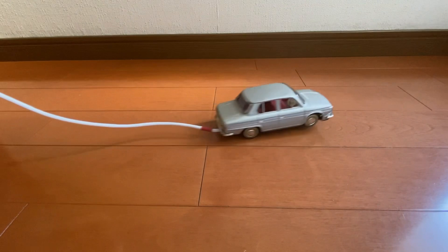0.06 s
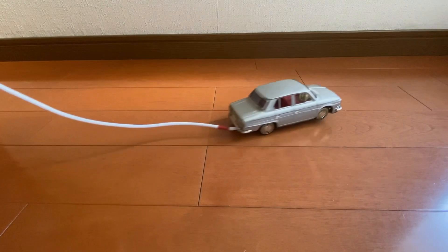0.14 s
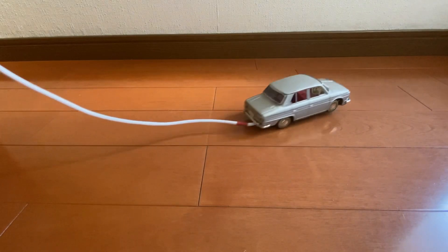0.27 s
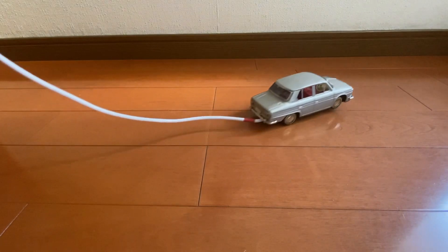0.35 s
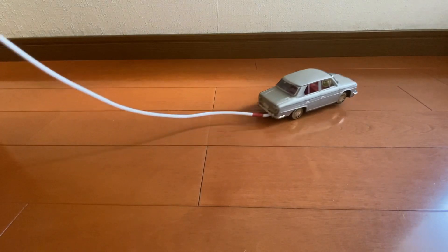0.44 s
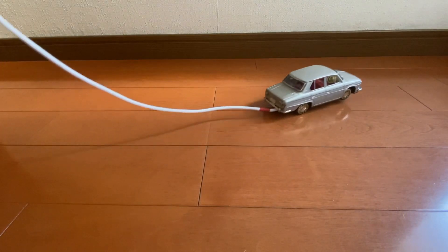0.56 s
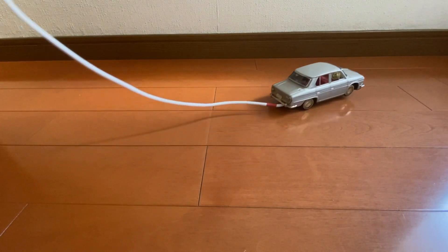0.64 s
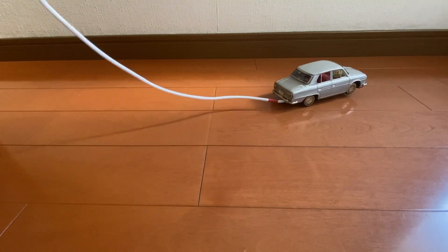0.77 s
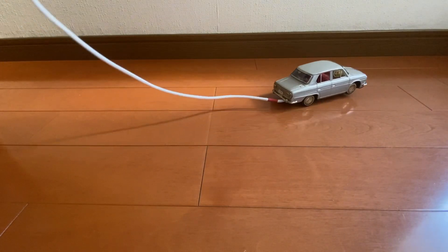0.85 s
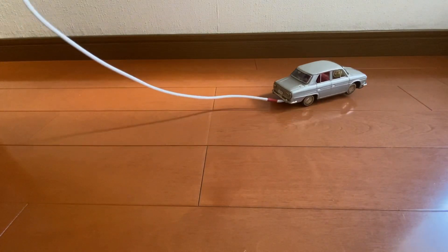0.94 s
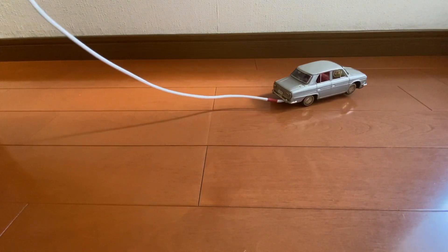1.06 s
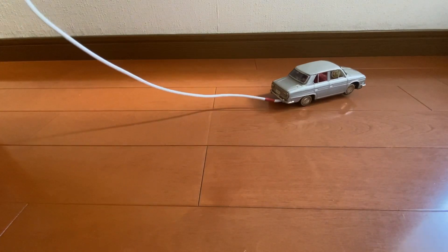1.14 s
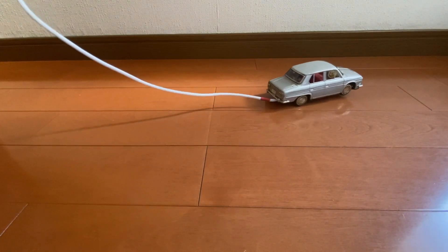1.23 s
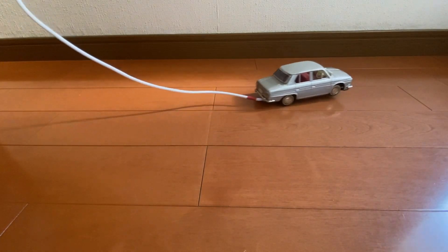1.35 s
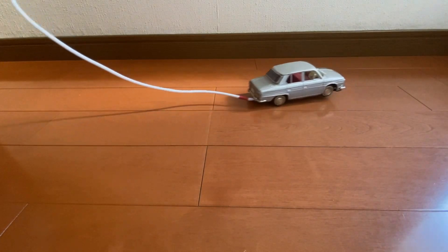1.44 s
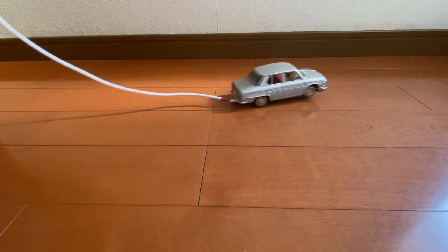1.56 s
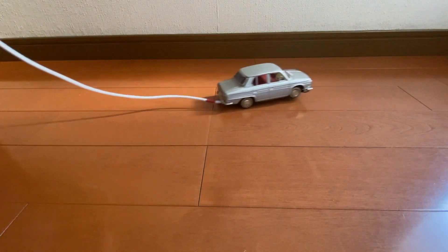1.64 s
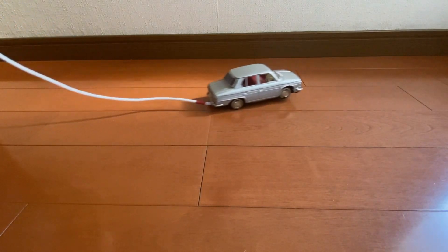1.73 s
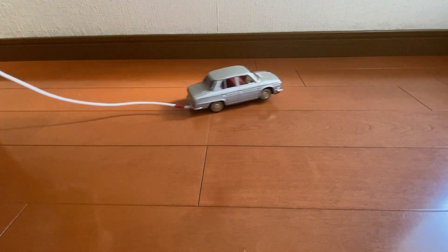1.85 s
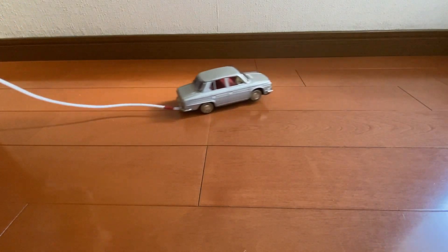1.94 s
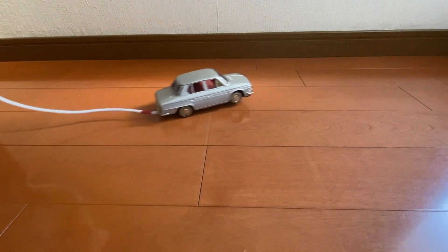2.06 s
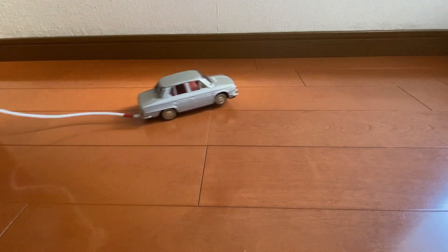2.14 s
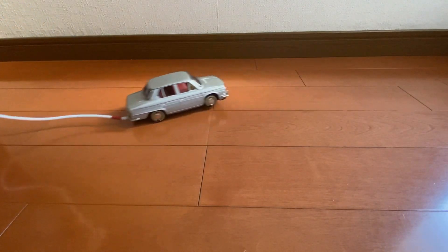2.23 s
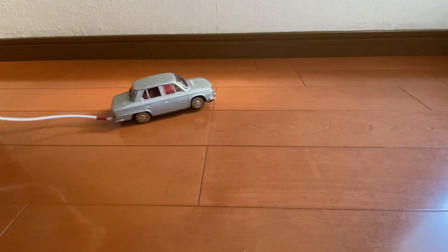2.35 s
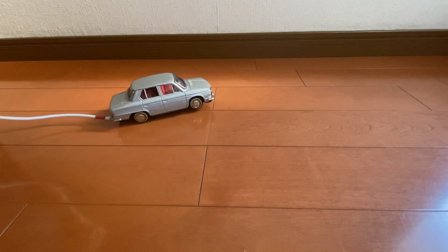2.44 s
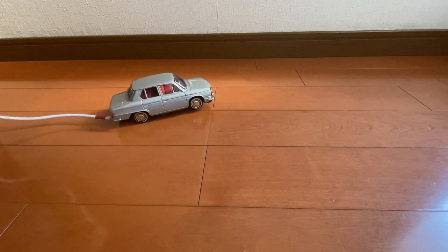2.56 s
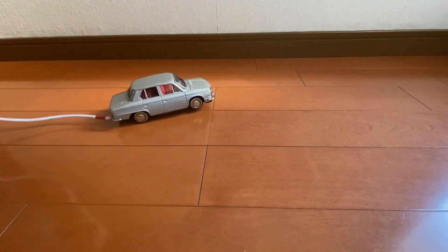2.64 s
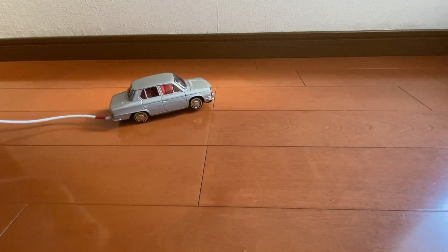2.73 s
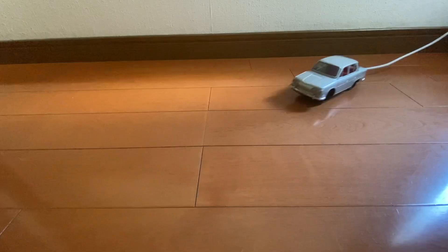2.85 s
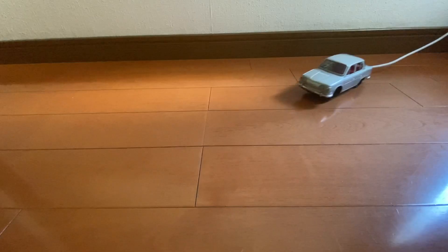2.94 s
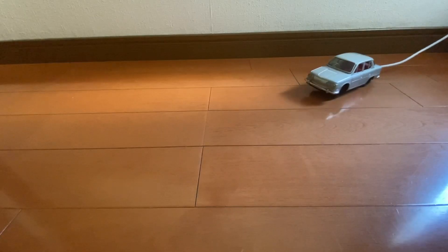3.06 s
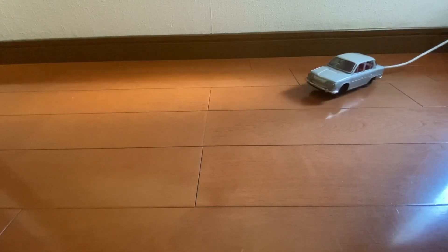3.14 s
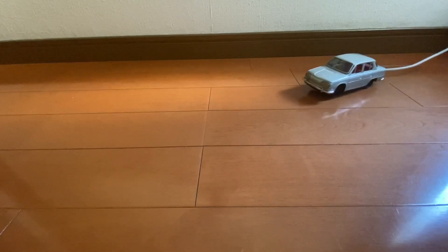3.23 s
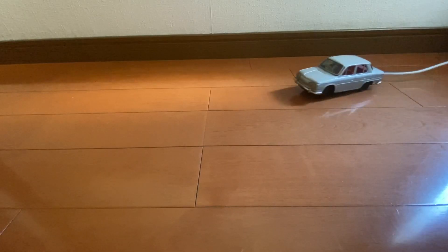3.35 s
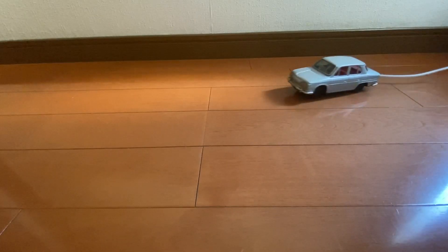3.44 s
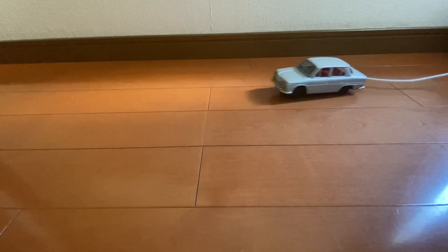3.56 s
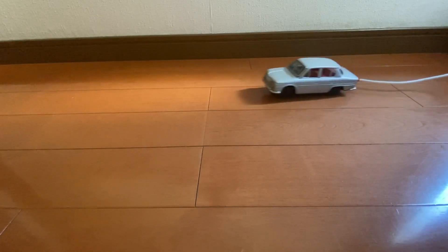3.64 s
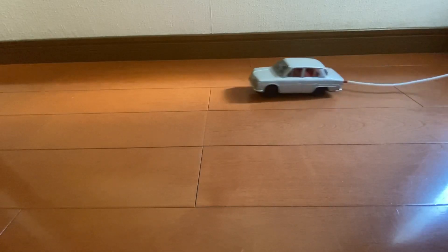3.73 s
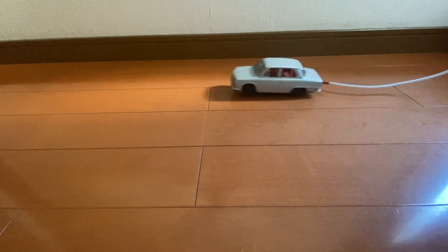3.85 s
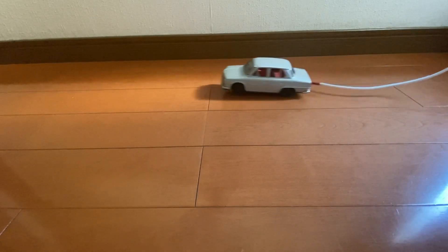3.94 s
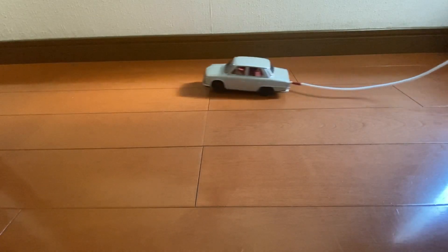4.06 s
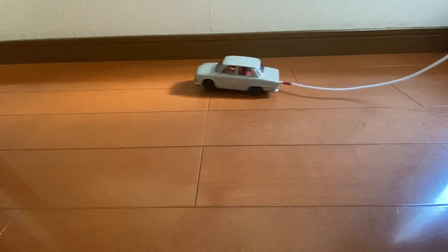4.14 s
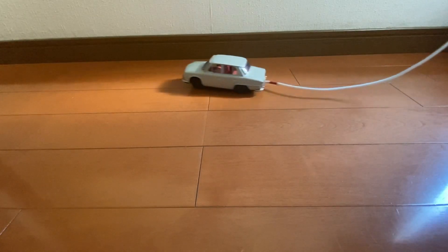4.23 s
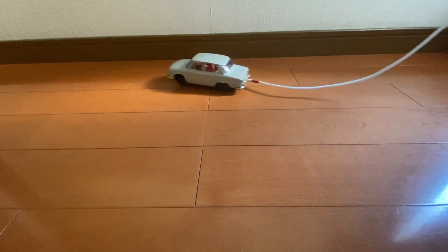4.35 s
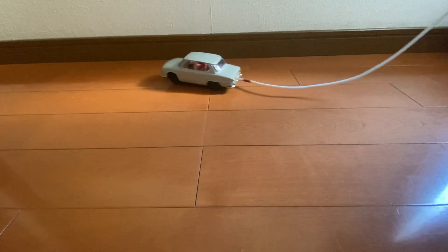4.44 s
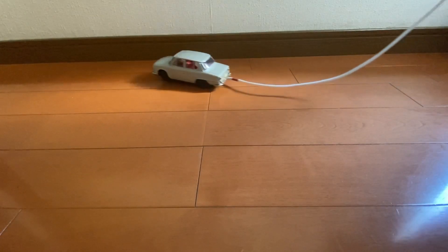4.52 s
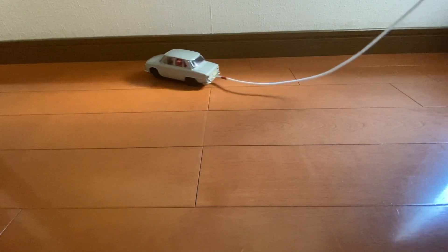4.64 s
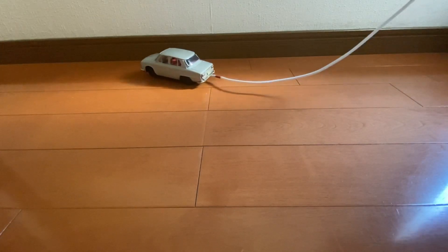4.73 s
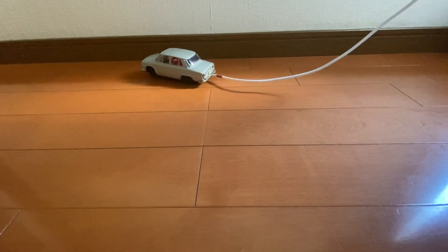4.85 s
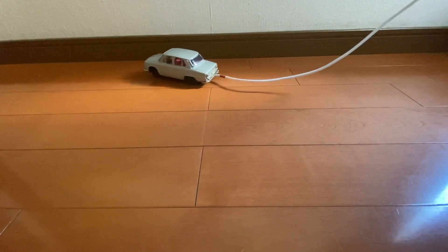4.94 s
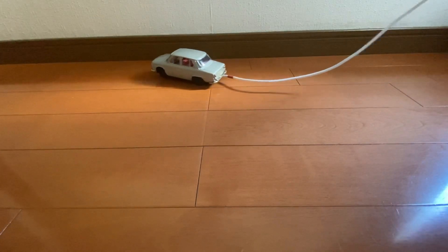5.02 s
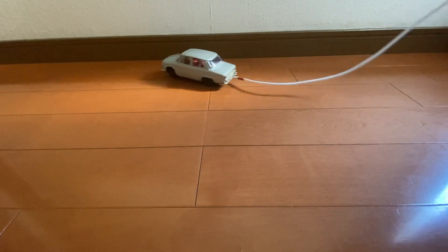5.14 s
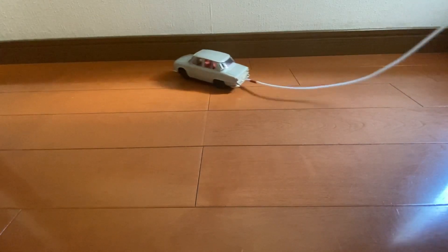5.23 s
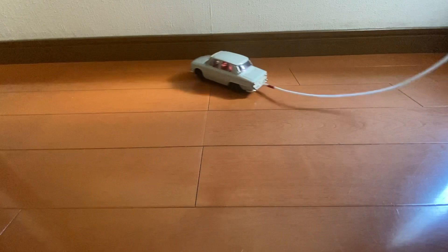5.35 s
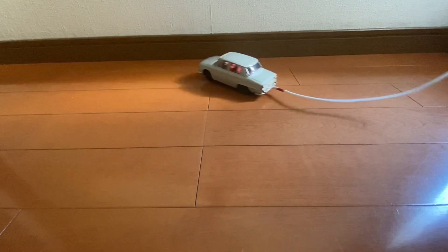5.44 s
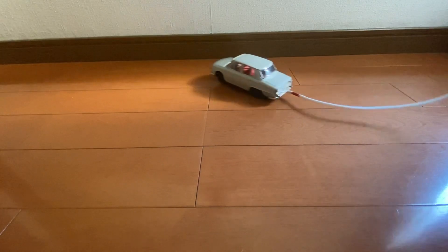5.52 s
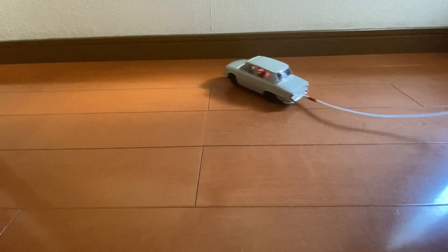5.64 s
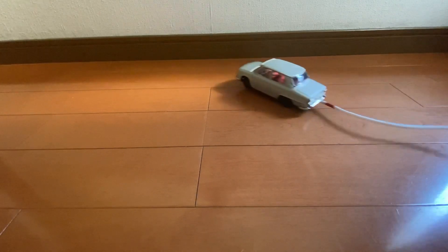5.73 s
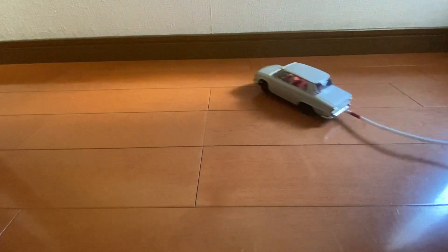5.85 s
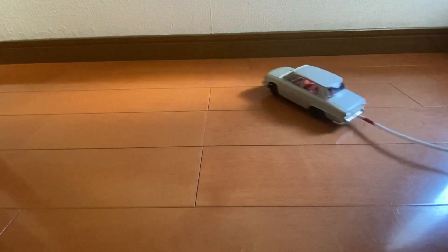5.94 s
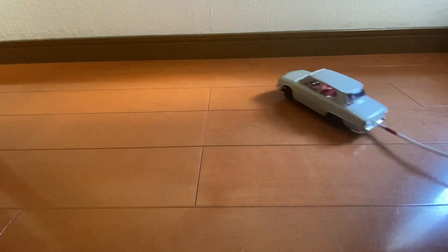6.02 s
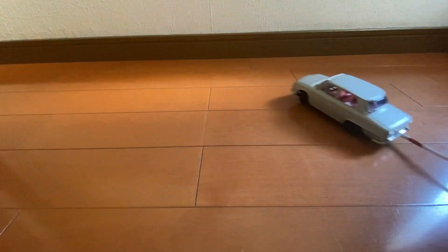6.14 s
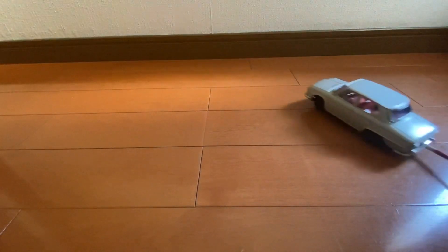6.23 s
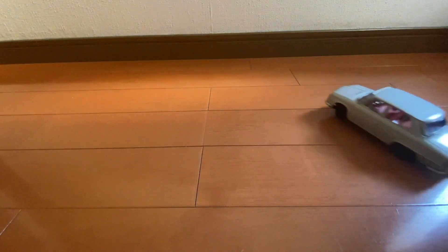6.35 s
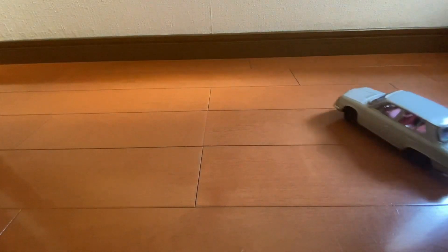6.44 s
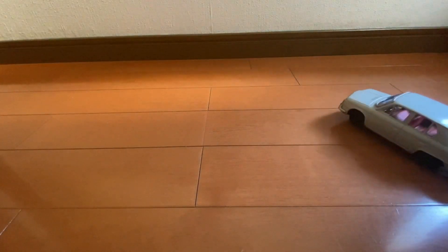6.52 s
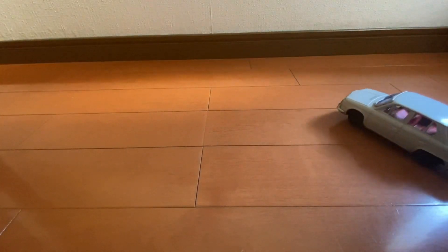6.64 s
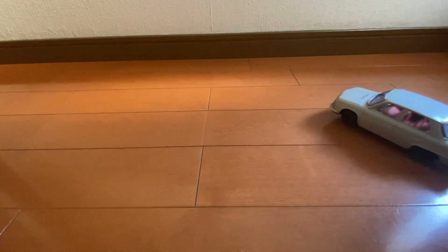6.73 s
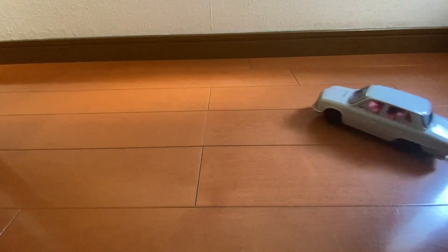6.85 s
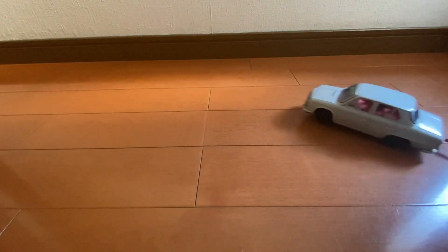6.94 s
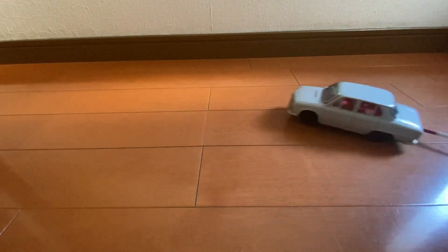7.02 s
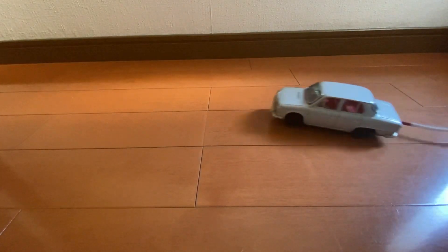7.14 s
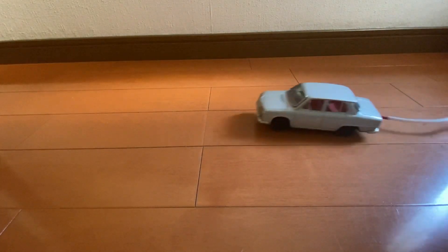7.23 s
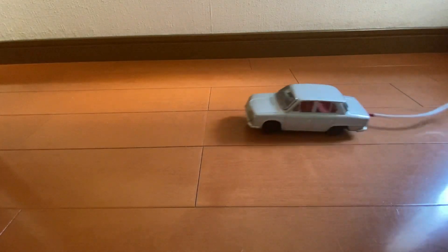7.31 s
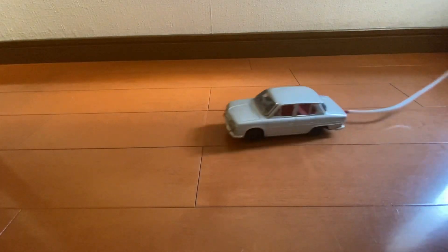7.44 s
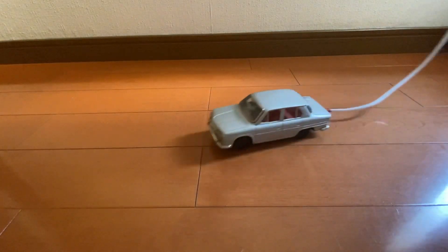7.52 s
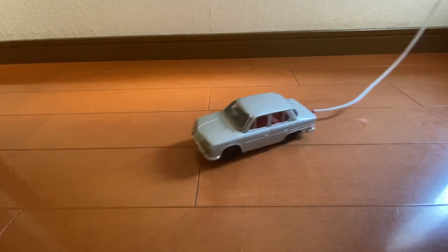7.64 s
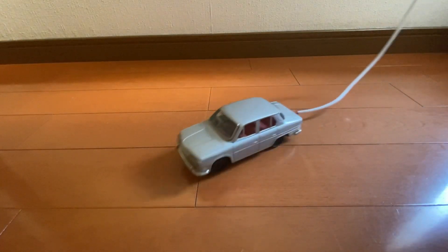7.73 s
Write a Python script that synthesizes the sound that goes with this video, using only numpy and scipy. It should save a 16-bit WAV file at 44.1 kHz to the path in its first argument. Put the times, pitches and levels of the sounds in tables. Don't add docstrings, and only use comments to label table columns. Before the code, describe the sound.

Bright, rattling gear whir from a small tin car runs in bursts of one to two seconds, forward and then in reverse with a slightly different buzz. Tiny squeaks follow the first stop. After an abrupt scene change near three seconds, longer runs continue with harder knocks and uneven wheel thumps on floorboards, in a small reverberant room, picked up nearby in stereo.

```python
import sys
import numpy as np
from scipy import signal
from scipy.fft import rfft, irfft
from scipy.io import wavfile
from scipy.ndimage import uniform_filter1d, map_coordinates

SR = 44100
rng = np.random.default_rng(int(sys.argv[2]) if len(sys.argv) > 2 else 0)


def file_out(sig):
    cols = np.atleast_2d(sig).T
    lim = np.clip(cols, -1, 1)
    pcm = np.round(lim * 32767).astype(np.int16)
    wavfile.write(sys.argv[1], SR, pcm)


def volts_from_decibels(level):
    exponent = np.asarray(level, float) / 20
    return 10 ** exponent


N = 343098
CUT_S = 2.861


def evened(x):
    return x / np.sqrt(np.mean(x ** 2) + 1e-20)


def steadied(x, span_s):
    power = uniform_filter1d(x ** 2, round(span_s * SR))
    return evened(x / np.sqrt(power + 0.16 * np.mean(x ** 2)))


def read(points, hz):
    f, value = np.transpose(points)
    return np.interp(np.log(hz + 1), np.log(f + 1), value)


def drift(top_hz):
    step = 64
    size = N // step + 2
    spectrum = rfft(rng.standard_normal(size))
    spectrum = spectrum / (1 + (np.fft.rfftfreq(size, step / SR) / top_hz) ** 2)
    slow = np.interp(np.arange(N) / step, np.arange(size), irfft(spectrum, size))
    return 2 * np.tanh(evened(slow) / 1.7)


def ring(x, modes, wander_db, order=1):
    out = np.zeros(N)
    for hz, width, db in modes:
        mode = x
        for _ in range(order):
            mode = signal.lfilter(*signal.iirpeak(hz, hz / (width * order ** .6), SR), mode)
        out += volts_from_decibels(db + wander_db * drift(2.)) * mode
    return out


def colour(x, points):
    log_gain = np.log(volts_from_decibels(read(points, abs(np.fft.fftfreq(4096, 1 / SR)))))
    taps = np.fft.ifft(np.exp(log_gain - 1j * signal.hilbert(log_gain).imag)).real
    return signal.oaconvolve(x, taps[:2048])[:N]


def teeth(per_s, spread_db):
    hardness_db = spread_db * np.minimum(rng.exponential(1, N), 5)
    size = volts_from_decibels(hardness_db) * rng.choice([-1., 1.], N)
    return evened(size * (rng.random(N) < per_s / SR))


# time in seconds, load on the gears in dB,
# twist of the chassis in dB, treble tilt in dB as the car's side faces the phone.
STRAIN = [(0, 0.4, 3.5, 10.5), (.5, .5, 0.5, 7.5), (1.2, .5, -0.5, 4), (1.4, -1, 1, 6),
          (1.6, .5, -1.5, 1.5), (2.2, -1, -6, 5), (3.2, 2.5, 1.3, 2), (3.5, 0.5, 1.5, 4),
          (3.9, .5, 6.5, 4.5), (4.2, 0, 4, 2.5), (4.45, 0, -1, 0), (5.1, 0.5, 0.5, 0), (5.6, -1, 5, 4.5),
          (5.95, 2, 2, 9), (6.3, 2.5, -3, 5.5), (6.85, 1, -2.5, 3), (7.2, 0, 1.5, 9), (7.78, -.5, 1, 6.5)]


def strain(column):
    points = np.array(STRAIN)
    return np.interp(np.arange(N) / SR, points[:, 0], points[:, column])


# start in seconds, stop in seconds,
# effort in dB, slowing before the stop in seconds, roof boom in dB.
RUNS = [
    (-.2, 0.653, -25, 0.085, -10),
    (0.812, 1.065, -54.5, 0.032, -22),
    (1.053, 2.275, -27, .04, -18.5),
    (2.8, 2.925, -27, 0.018, -6.5),
    (2.935, 3.065, -63, 0.12, -14),
    (3.083, 4.639, -28, 0.033, -7),
    (4.754, 6.397, -28.5, .02, -12.5),
    (6.567, 7.996, -26, 0.018, -7),
]
FORWARD = (True, True, False, False, False, True, False, True)
# steady drumming of the boards in that run, in dB.
ROLLING_DB = (-31, -49.5, -31.5, -27, -38, -31, -33, -30.5)


def along_runs(layer, shot):
    spin_up_s, roll_up_s, stop_s = 0.037, 0.07, 0.015
    slowed = 0.2
    load, twist = strain(column=1), strain(column=2)
    for (start, stop, db, slowing, boom_db), boards_db, forward in zip(RUNS, ROLLING_DB, FORWARD):
        if (stop > CUT_S) != shot:
            continue
        span = slice(max(round(start * SR), 0), min(round((stop + stop_s) * SR), N))
        t = np.arange(span.start, span.stop) / SR
        load_db, twist_db = load[span], twist[span]
        since = np.maximum(t - start, 0)
        speed = 1 - np.exp(-since / spin_up_s)
        speed = speed * np.interp(t, [stop - slowing, stop], [1, slowed])
        if layer == "boards":
            speed = 1 - np.exp(-since / roll_up_s)
        law, level_db = dict(
            shell=(0.9, db + load_db),
            boom=(2.2, db + load_db + boom_db + 0.51 * twist_db),
            buzz=(2.2, db + load_db - 10.5),
            chassis=(0.42, db - 12 + twist_db),
            boards=(1.3, boards_db + 0.55 * load_db))[layer]
        fade = np.clip((stop - t) / stop_s + 1, 0, 1)
        yield span, fade * speed ** law * volts_from_decibels(level_db), forward


def driven(forward_sound, reverse_sound, layer, shot):
    out = np.zeros(N)
    for span, level, forward in along_runs(layer, shot):
        sound = forward_sound if forward else reverse_sound
        out[span] += level * sound[span]
    return out


def gear_train():
    return teeth(3500, 1.98) * volts_from_decibels(0.22 * drift(3.1) + 2.85 * drift(112))


# frequency in Hz, density in dB per Hz.
CHATTER = [(700, -47), (900, 6), (1250, -2.5), (1460, -6.5), (1880, 4), (2310, -1), (2720, 1.5),
           (4060, -4.5), (8730, -5.5), (10000, -9), (12000, -5.5), (13500, -18), (14300, -6.5),
           (15500, -8.5)]
# frequency in Hz, width in Hz, level over the chatter in dB.
SHELL_FORWARD = [(1430, 40, 8), (1601, 69, 5), (1710, 64, -4), (2030, 130, -1), (1864, 26, -2),
                 (2695, 133, 0.5), (3070, 83, -8.5), (3580, 200, -5.5), (4630, 80, -11), (7500, 770, -6.5)]
SHELL_REVERSE = [(1460, 25, 9.5), (1652, 25, 11.5), (1848, 150, -1), (2043, 104, 6.5), (2375, 42, 3),
                 (2673, 210, -1.5), (2840, 170, -6), (3570, 340, -2), (4820, 850, 1.5), (7050, 2400, 0.5)]


def tin_shell(gears):
    bright = colour(gears, CHATTER)
    rasp = signal.lfilter(*signal.butter(2, 5300, "high", fs=SR), bright)
    bright += rasp * (volts_from_decibels(2.5 * drift(66)) - 1)
    return [evened(bright + ring(bright, modes, 1.5)) for modes in (SHELL_FORWARD, SHELL_REVERSE)]


# frequency in Hz, width in Hz, level in dB.
ROOF_FORWARD = [(975, 26, 6), (1008, 20, 10), (1036, 22, 12), (1110, 26, 1), (1200, 24, 3)]
ROOF_REVERSE = [(947, 21, -6), (1014, 20, -6), (1067, 70, -7), (1108, 37, -8), (1197, 18, 4)]


def tin_roof(gears):
    return [steadied(ring(gears, modes, 0.27, order=2), 0.079) for modes in (ROOF_FORWARD, ROOF_REVERSE)]


# frequency in Hz, width in Hz, level in dB.
CHASSIS_LOW = [(206, 68, 3.5), (230, 55, -28), (291.7, 37.7, 9.5), (312.6, 58, 1), (392.3, 8.1, 8.5)]
CHASSIS_HIGH = [(408, 31, 1), (453, 28, -0.5), (499, 20.6, 2.5), (545.6, 13.3, -2.5), (624.5, 20, -2),
                (820, 76, -6)]


def chassis_hum(gears):
    low, high = (ring(gears, modes, 1.5, order=2) for modes in (CHASSIS_LOW, CHASSIS_HIGH))
    tilt = volts_from_decibels(strain(column=3))
    return steadied(low / tilt + high * tilt, 0.094)


def car_layers():
    gears = gear_train()
    boom, buzz = tin_roof(gears)
    return dict(shell=tin_shell(gears), boom=[boom] * 2, buzz=[0 * buzz, buzz],
                chassis=[chassis_hum(gears)] * 2)


# frequency in Hz, density in dB per Hz.
HUSH = [(30, 10.5), (60, -14), (86, 11), (150, 2), (300, -2), (547, -17), (1090, -4), (3000, -20),
        (7670, -14), (11700, -23), (16000, -24)]


def hush():
    left, right, shared = rng.standard_normal((3, N))
    return volts_from_decibels(-59) * np.array([evened(colour(shared + 1.1 * own, HUSH)) for own in (left, right)])


# frequency in Hz, width in Hz, level in dB.
BOARDS = [(82.3, 9.8, 4.04), (94.3, 20.3, -3.5), (103.1, 11.6, -2), (123.5, 25, -13), (144.8, 13.4, -13.5),
          (191, 30.4, -18.5)]
# time in seconds, level in dB.
THUMPS = [(.15, -35), (.31, -44), (.43, -31), (.675, -32.5), (1.18, -41), (1.39, -34), (1.59, -45),
          (1.69, -34), (1.93, -38), (2.18, -29.5), (2.26, -34), (3.17, -40), (3.25, -34), (3.36, -28),
          (3.65, -24.5), (3.86, -37), (4.17, -29), (4.46, -38), (4.59, -51), (5.26, -33.5), (5.5, -33),
          (5.75, -28), (5.98, -25.5), (6.25, -24.5), (6.37, -35), (6.68, -26), (6.82, -28), (7.09, -28.5),
          (7.36, -32), (7.61, -29.5)]


def floorboards():
    t, steady = np.arange(N) / SR, np.ones(N)
    level = driven(steady, steady, "boards", False)
    level += driven(steady, steady, "boards", True) * (t > CUT_S)
    for s, db in THUMPS:
        near = slice(round((s - .1) * SR), round((s + .1) * SR))
        level[near] += volts_from_decibels(db) * np.exp(-((t[near] - s) / 0.036) ** 2)
    level_db = 20 * np.log10(level + 1e-6)
    level = np.zeros(N)
    for fall, db in ((190, 0), (82, -37)):
        level += volts_from_decibels(np.maximum.accumulate(level_db + fall * t) - fall * t + db)
    small_boards = signal.butter(5, 64, "high", fs=SR, output="sos")
    patterns = []
    for _ in range(2):
        drumming = steadied(ring(teeth(600, 2.02), BOARDS, 1.66, order=2), 0.057)
        patterns.append(signal.sosfilt(small_boards, level * drumming))
    even, uneven = patterns
    return even, colour(uneven, [(60, -17), (95, -20), (140, -2)])


# frequency in Hz, t60 in seconds.
ROOM = [(100, 0.96), (500, 0.68), (2000, 0.6), (6000, 0.47), (15000, 0.38)]


def room(x, start, stop):
    size, out, first = SR // 2, np.zeros((2, N)), max(start - SR // 2, 0)
    slots = np.arange(120, size - 20, 10)
    for k in range(3):
        taps = np.zeros((2, size))
        at = slots + rng.integers(0, 10, (2, len(slots)))
        np.put_along_axis(taps, at, rng.choice([-1., 1.], at.shape), 1)
        taps *= 1 + 3.53 * np.exp(-np.arange(size) / (0.0059 * SR))
        hz, t, z = signal.stft(taps, SR, nperseg=256)
        tail = signal.istft(z * volts_from_decibels(-60 * t / read(ROOM, hz)[:, None]), SR, nperseg=256)[1]
        feed = np.sqrt(2 / 3) * np.cos(np.pi * (6 * np.arange(first, stop) / SR + k / 3))
        wet = signal.oaconvolve((x[first:stop] * feed)[None], tail / np.linalg.norm(tail[0]), axes=1)
        out[:, start:stop] += wet[:, start - first:stop - first]
    shared = signal.lfilter(*signal.butter(1, 350, fs=SR), out[0] - out[1]) / 2
    return out - [shared, -shared]


# time in seconds, lag of the left port in samples.
LAG = [(0, 2), (1.2, 2), (1.7, -2), (2.3, -6), (2.5, -1), (2.8, -1), (2.87, 5), (3.25, 4), (3.75, 1),
       (4.25, -2), (4.75, -5), (5.25, -4), (5.75, 1), (6.25, 6), (6.75, 9), (7.25, 3), (7.78, 0)]


def ports(x):
    lag = np.interp(np.arange(N) / SR, *np.transpose(LAG)) / 2
    return np.array([map_coordinates(x, [np.arange(N) - side * lag], order=2) for side in (1, -1)])


# time in seconds, peak level in dB, t60 in seconds, centre frequency in Hz.
KNOCKS = [(0.655, -15, 0.03, 4600), (0.661, -24.5, 0.16, 4650), (.87, -38, 0.032, 4520),
          (1.071, -25, 0.031, 4600), (1.179, -14, 0.022, 9000), (2.524, -41, 0.047, 1940),
          (2.528, -32, 0.023, 5000), (2.535, -19.5, .022, 2700), (2.5415, -22, .03, 2300),
          (2.546, -27, .07, 1250), (2.895, -12, 0.05, 5960), (2.897, -8, 0.025, 1840),
          (3.095, -25, 0.035, 2940), (3.357, -11, 0.018, 6560), (4.148, -19, .04, 450),
          (4.362, -13, 0.034, 7800), (4.584, -23, 0.087, 293), (4.778, -22, 0.029, 1490),
          (4.86, -14, 0.025, 8840), (5.253, -10.5, 0.016, 7900), (5.38, -13.5, 0.021, 8200),
          (6.245, -12.5, 0.073, 8000), (6.385, -11, 0.033, 2090), (6.563, -26, 0.05, 2990),
          (7.3, -23, 0.039, 8000), (7.32, -13, 0.071, 2880)]


def knocks():
    out, t = np.zeros(N), np.arange(5000) / SR
    for s, db, t60, hz in KNOCKS:
        hit = volts_from_decibels(-60 * t / t60) * rng.standard_normal(len(t))
        burst = signal.lfilter(*signal.iirpeak(hz, 1.6, SR), hit)
        out[round(s * SR):][:len(t)] += volts_from_decibels(db) * burst / abs(burst).max()
    return out


# start in seconds, length in seconds, frequency in Hz, level in dB.
SQUEAKS = [
    (.825, .065, 1862, -52),
    (.925, .03, 3520, -60),
    (.93, .03, 2050, -60),
    (.92, .05, 1390, -59),
    (.966, .078, 1410, -43),
    (1.015, .032, 3500, -58),
    (1.015, .03, 2650, -63),
]


def axle_squeaks():
    out = np.zeros(N)
    for s, length, hz, db in SQUEAKS:
        u = np.arange(round(length * SR)) / SR
        slip = np.cumsum(rng.standard_normal(len(u))) * .012
        tone = np.sin(2 * np.pi * hz * u + slip) * signal.windows.tukey(len(u), .4)
        out[round(s * SR):][:len(u)] += volts_from_decibels(db) * tone
    return out


def scene():
    layers, hits, cut = car_layers(), knocks() + axle_squeaks(), round(CUT_S * SR)
    drum, uneven = floorboards()
    direct, out = np.zeros(N), hush() + [drum + uneven, drum - uneven]
    for shot, start, stop in ((False, 0, cut), (True, cut, N)):
        car = sum(driven(*pair, name, shot) for name, pair in layers.items())
        car[start:stop] += hits[start:stop]
        direct[start:stop] = car[start:stop]
        out += room(volts_from_decibels(-0.5) * car + volts_from_decibels(-12.5) * drum, start, stop)
    return out + volts_from_decibels(-3.5) * ports(direct)


def roll_off(x):
    return signal.sosfilt(signal.butter(12, 17110, fs=SR, output="sos"), x)


def record(dry):
    low_cut = signal.butter(2, 45, "high", fs=SR, output="sos")
    return roll_off(signal.sosfilt(low_cut, dry))


dry = scene()
out = record(dry)
file_out(out)
```